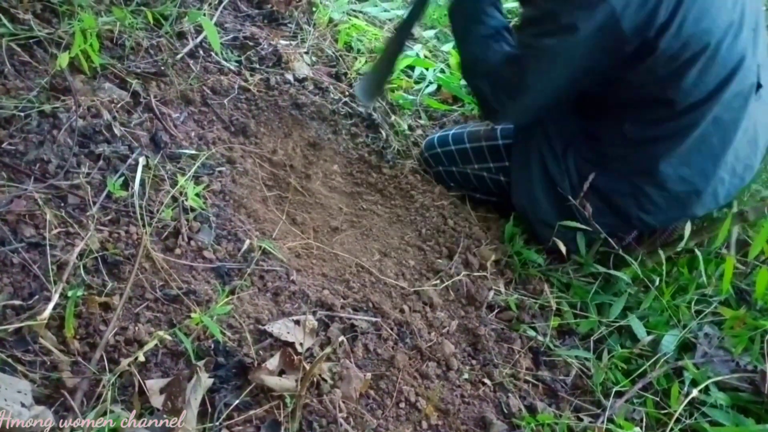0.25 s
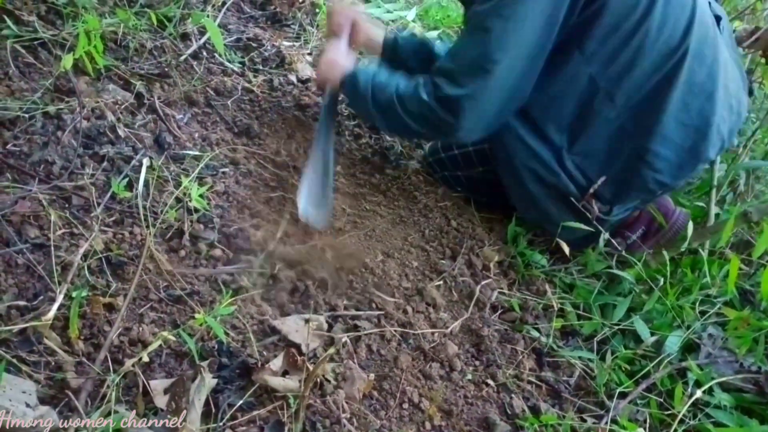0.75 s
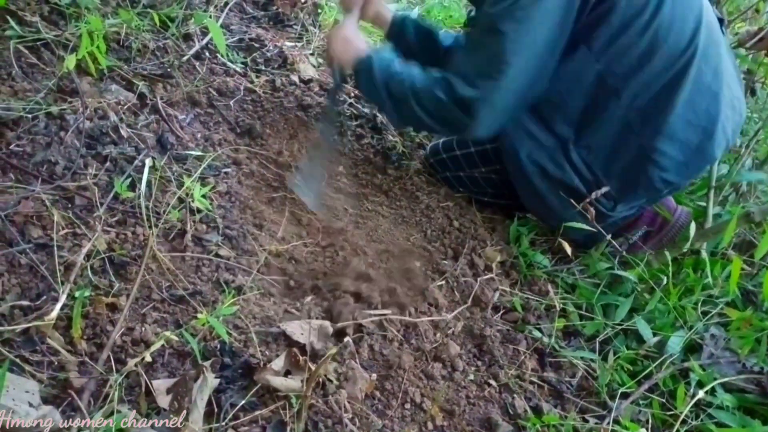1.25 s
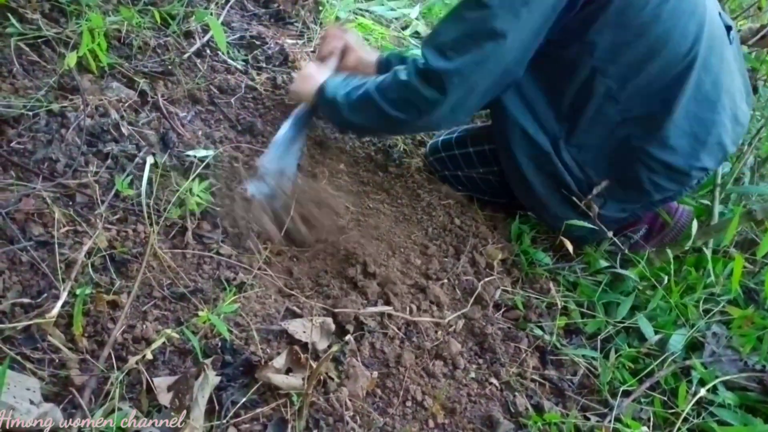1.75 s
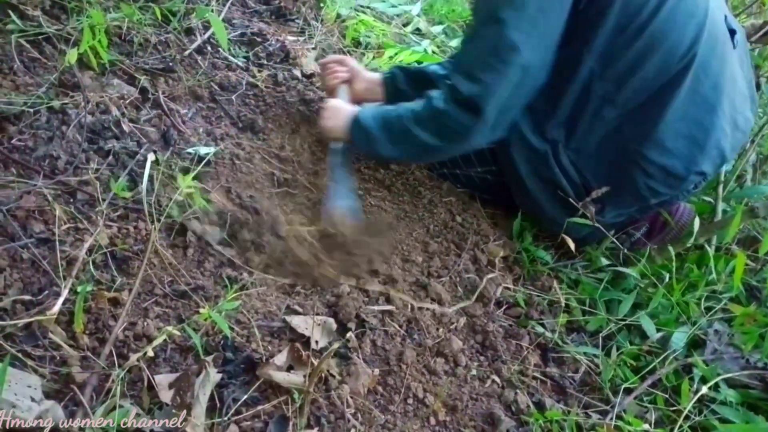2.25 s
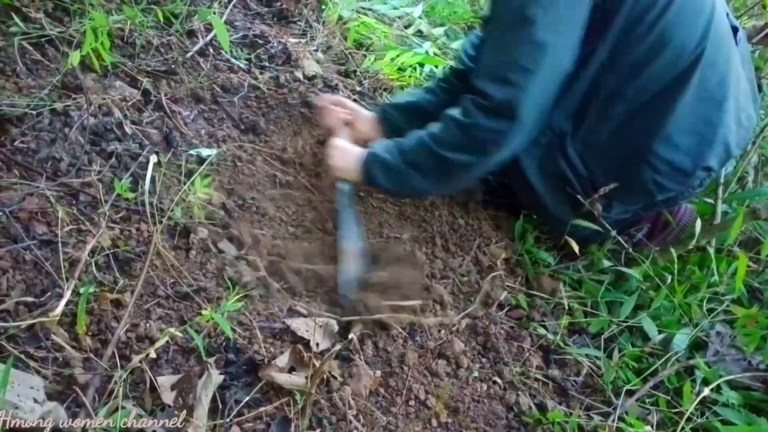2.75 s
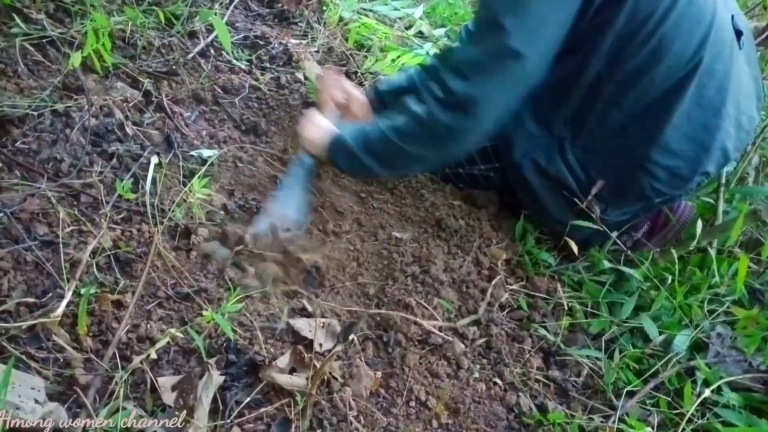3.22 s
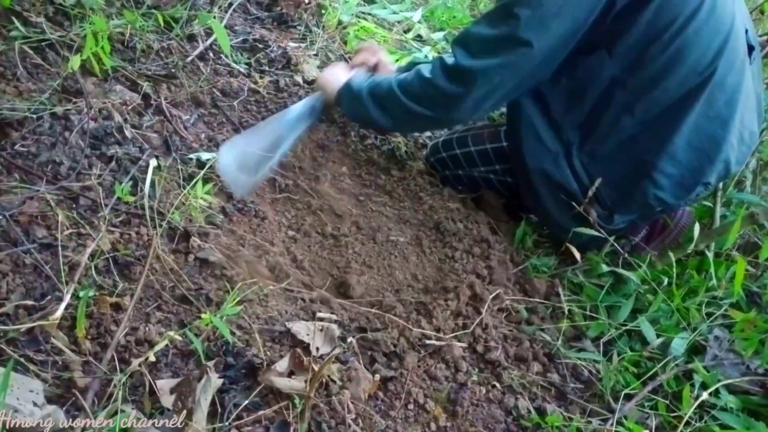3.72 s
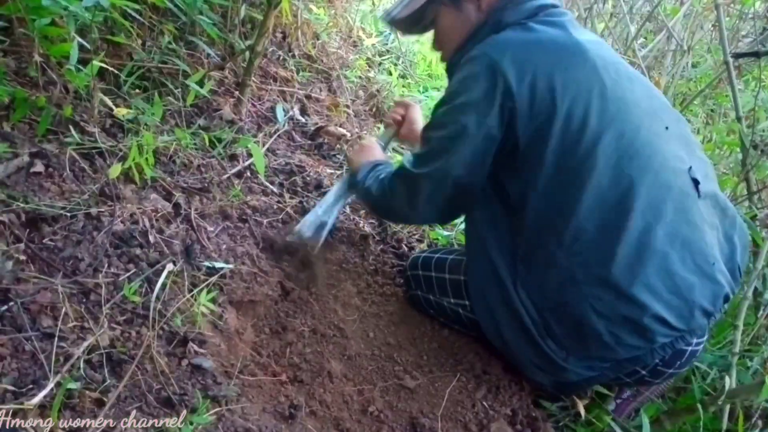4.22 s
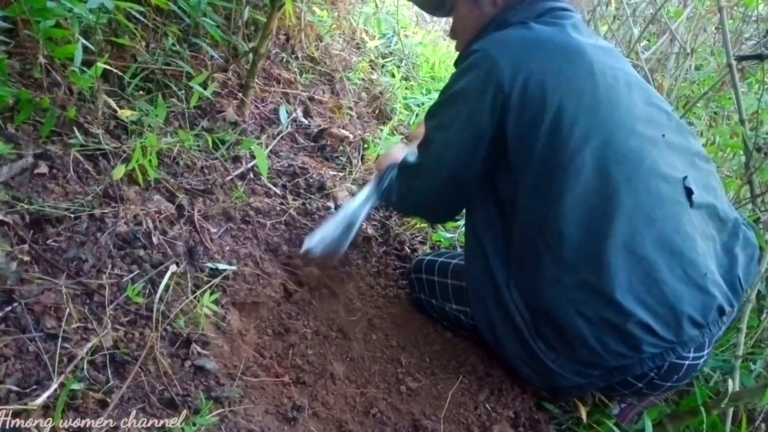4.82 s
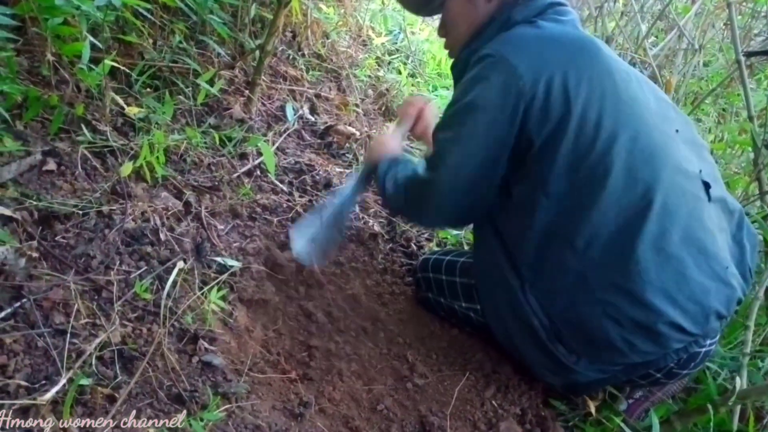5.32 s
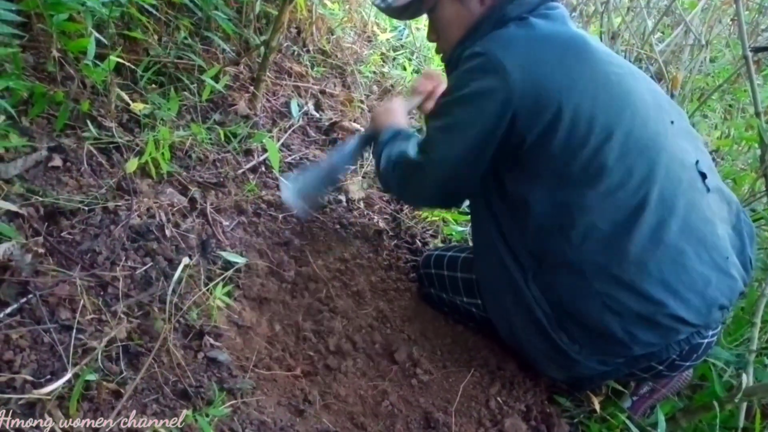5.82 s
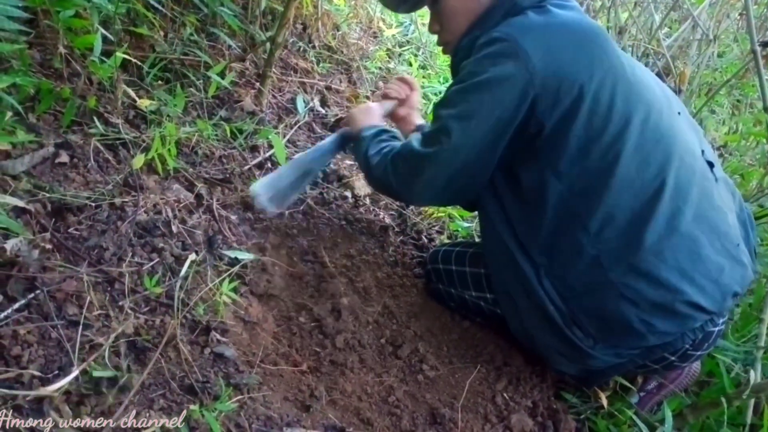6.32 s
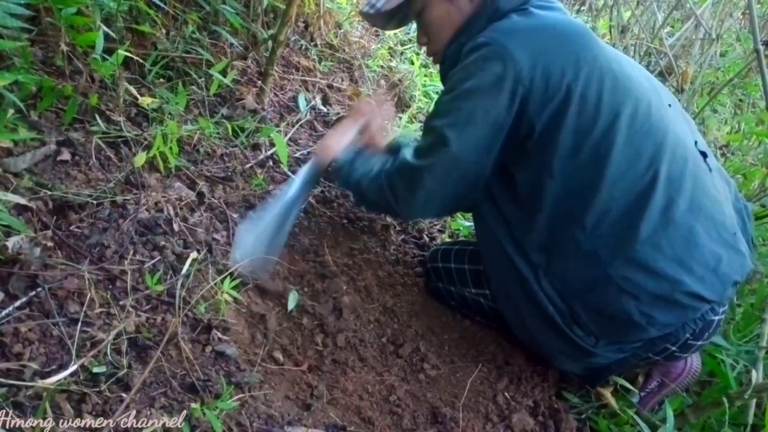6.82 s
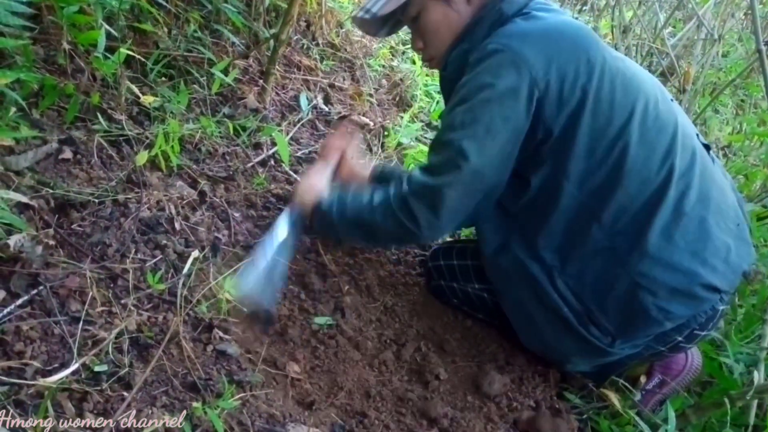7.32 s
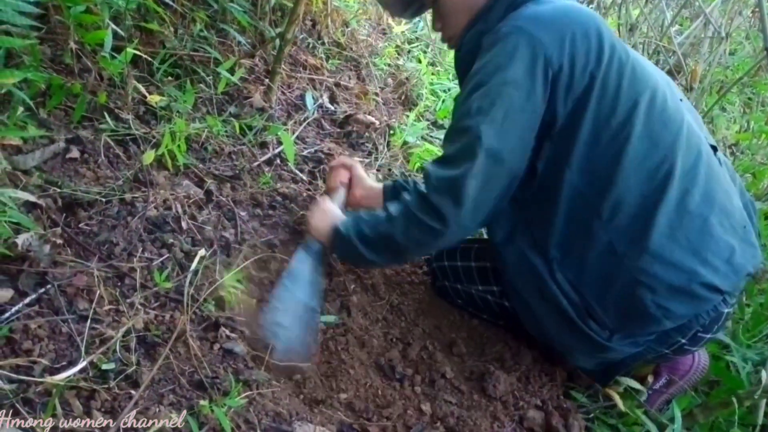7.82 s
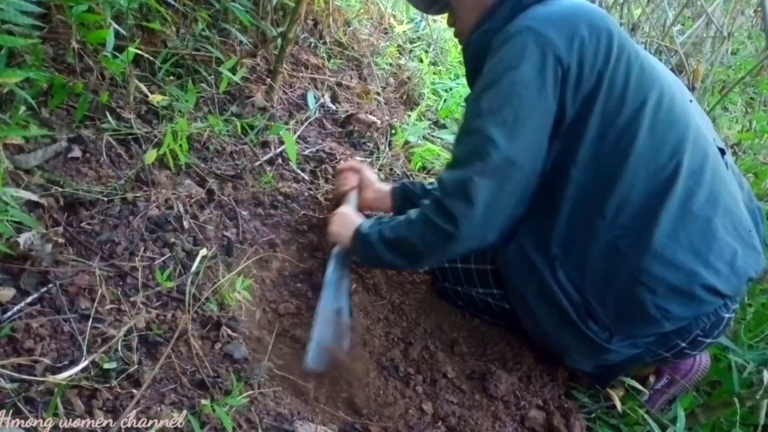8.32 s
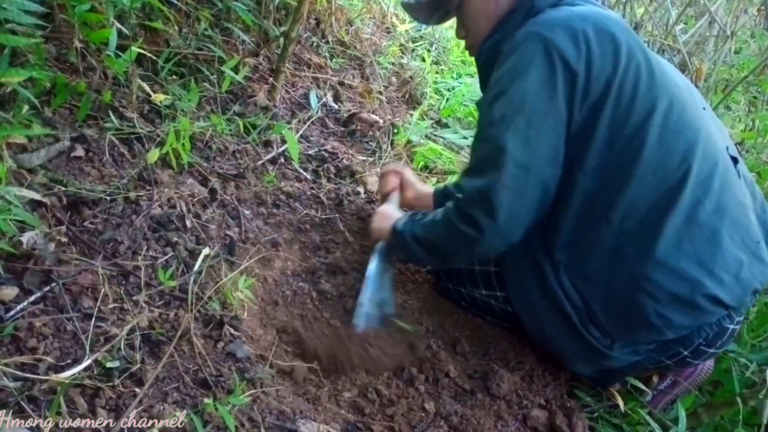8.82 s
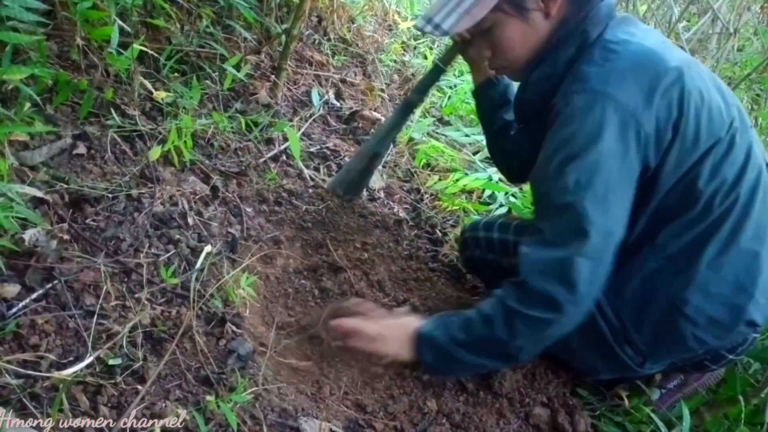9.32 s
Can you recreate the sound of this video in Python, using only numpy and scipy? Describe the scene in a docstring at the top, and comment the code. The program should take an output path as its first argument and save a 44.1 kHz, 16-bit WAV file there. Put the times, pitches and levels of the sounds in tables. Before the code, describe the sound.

A steel blade chops into loose soil about twice a second, crunching and ringing as crumbs patter down.

```python
"""First comes a faint open-air hiss and a trickle of loose soil. Then a broad steel blade chops into a
hillside about twice a second: each bite thuds, crunches and sets the steel ringing, and small stones
jolt it. Between chops, flung soil patters down, pebbles tick and clink, and a few clods land.
The digging moves on to a firmer, moister spot, where hard blows make the tool knock,
while an insect trills far away."""
import sys
import numpy as np
from scipy import signal
from scipy.io import wavfile

SR = 44100
rng = np.random.default_rng(int(sys.argv[2]) if len(sys.argv) > 2 else 0)


def master_out(mix):
    """Clip the mix to full scale and print it as 16-bit PCM to the path in sys.argv[1]."""
    frames = np.transpose(np.atleast_2d(mix))
    ceiling = np.clip(frames, -1, 1)
    pcm = np.round(ceiling * 32767).astype(np.int16)
    wavfile.write(sys.argv[1], SR, pcm)


N = 421596
SECOND_SPOT_S = 3.9  # when the digging moves to firmer, moister ground


def amp(db):
    """Turns decibels into a number to multiply by."""
    return 10 ** (np.asarray(db) / 20)


def unit(x):
    """Scales a sound to an energy of one."""
    return x / np.sqrt(np.sum(x ** 2) + 1e-20)


def add(mix, s, sound):
    """Mixes a sound in, starting at s seconds."""
    part = mix[max(round(s * SR), 0):][:len(sound)]
    part += sound[:len(part)]


def through(x, response):
    """Plays a sound through an object, given the object's response to one tap."""
    return signal.oaconvolve(x, response)[:len(x)]


def click(spectrum, size=8192):
    """The shortest click with this spectrum (how strong each frequency is)."""
    hz, db = np.transpose(spectrum)
    bins_hz = abs(np.fft.fftfreq(size, 1 / SR))
    log_gain = np.log(amp(np.interp(np.log(bins_hz + 1), np.log(hz), db)))
    front_loaded = np.exp(np.conj(signal.hilbert(log_gain)))  # minimum phase: energy comes early
    return unit(np.fft.ifft(front_loaded).real[:size // 2])


def mode(hz, t60):
    """One natural tone of an object, fading by 60 dB in t60 seconds."""
    t = np.arange(SR // 5) / SR
    return unit(np.exp(-np.log(1000) * t / t60) * np.sin(2 * np.pi * hz * t))


def grains(count, per_s, spread_db):
    """Random tiny impacts, many small and a few large, at an average power of one."""
    size = amp(abs(spread_db) * np.minimum(rng.exponential(1, count), 4))
    sign = rng.choice([-1, 1], count)
    lands = rng.random(count) < per_s / SR
    return np.sqrt(count) * unit(size * sign * lands)


def wander(count, per_s):
    """A curve that drifts to a new random value per_s times a second."""
    targets = rng.standard_normal(N // 20)
    return np.interp(np.arange(count) * per_s / SR, np.arange(len(targets)), targets)


def push(t, rise, hold, fall):
    """A force that builds, holds and dies away (times in seconds)."""
    return np.minimum(t / rise, 1) * np.exp(-np.maximum(t - hold, 0) / fall)


def excite(force, impacts, response):
    """Tiny impacts shake an object; the sound is as strong as the force behind them."""
    return np.linalg.norm(force) * unit(through(force * impacts, response))


# The tone colour of the open air: f/Hz, level/dB
AIR_SPECTRUM = [(25, 8), (45, -11), (80, -1.5), (125, 1), (200, -1.5), (310, -9), (750, -5.5),
                (1250, -11.5), (2000, -13), (3000, -11), (4600, -25.5), (6500, -19.5), (11000, -27),
                (15500, -34)]
def air(level_db=-61.5):
    """Outdoor hiss over a soft rumble, wavering slightly."""
    gain = amp(level_db + wander(N, per_s=4.6))
    return gain * through(rng.standard_normal(N), click(AIR_SPECTRUM))


# The blade's own tones: f/Hz, fade time in free air/s, level at first spot/dB, level at second spot/dB
BLADE_MODES = [(2000, 0.016, -43, -6), (2315, 0.022, -5, -1), (2751, 0.16, 3.5, 8), (2848, 0.11, 6, -32),
               (2877, 0.0094, -9, -8), (3050, 0.021, -10, -14), (3246, 0.086, -4, 2),
               (3484, 0.032, -8, -11), (3690, 0.2, -6.5, -6.5), (3708, 0.25, -10, -3.5),
               (3890, 0.082, -37, -8), (4500, 0.06, -41, -16), (5130, 0.054, -38, -8.5),
               (5930, 0.046, -22, -13), (6260, 0.13, -11.5, -24), (6950, 0.045, -9, -26),
               (8740, .055, -10, -5.5), (10900, 0.07, -18, -13), (12300, 0.08, -24, -19)]
# The tone colour of grit scraping steel: f/Hz, level/dB
SCRAPE_SPECTRUM = [(1000, -9.5), (1900, -7.5), (2400, 1), (2900, 11.5), (3650, 4.5), (4100, -30.5),
                   (5000, -36), (11000, -27), (15500, -45)]
def blade(s, loss, scrape_db, clink_db=0, scatter_db=4.5):
    """One grain on steel: a dry scrape, and tones that soil muffles (loss, per s) and slightly detunes."""
    clink_hz, clink_width_hz = 3600, 340  # these tones sing out when the blade's corner strikes
    ring = 0
    for hz, t60, *spot_db in BLADE_MODES:
        db = spot_db[int(s > SECOND_SPOT_S)] + scatter_db * rng.standard_normal()
        db += clink_db * np.exp(-((hz - clink_hz) / clink_width_hz) ** 2)
        detune = 1 + 0.00063 * loss * rng.standard_normal()
        ring = ring + amp(db) * rng.choice([-1, 1]) * mode(hz * detune, 1 / (1 / t60 + loss))
    ring = unit(ring)
    add(ring, 0, amp(scrape_db) * click(SCRAPE_SPECTRUM))
    return unit(ring)


# Crumbs that never quite settle, one row per spot: slide level/dB, patter level/dB
CRUMB_TRICKLE = [(-62, -71), (-91, -71)]
# Loads of flung soil: t/s at the thickest, spread/s, slide level/dB, patter level/dB
SOIL_THROWS = [(0.39, 0.049, -58, -65.5), (0.679, 0.025, -54, -62), (1.08, 0.073, -51.5, -60),
               (1.659, 0.081, -54, -61.5), (1.846, 0.038, -54, -55.5), (2.16, 0.06, -47, -57.5),
               (2.349, 0.072, -58.5, -61.5), (2.719, 0.054, -55, -60.5), (2.861, 0.039, -53, -57.5),
               (3.209, 0.036, -47.5, -61), (3.35, 0.11, -48.5, -56), (3.53, 0.05, -49, -54.5),
               (4.08, 0.03, -62, -58.5), (4.29, 0.029, -65, -66), (5.169, 0.042, -61, -62),
               (5.65, 0.028, -60, -58), (5.961, 0.032, -53.5, -60.5), (6.459, 0.011, -49, -57.5),
               (6.98, 0.062, -55.5, -57), (7.241, 0.062, -52, -55), (7.469, 0.073, -62, -59.5),
               (7.77, 0.04, -53, -56.5), (8.238, 0.015, -53, -55.5), (8.37, 0.033, -60.5, -56),
               (8.719, 0.069, -66, -64), (9.219, 0.092, -57.5, -64)]
def soil_flow(step_s=0.002):
    """How much soil slides and patters: a trickle, the throws, and what strokes and stones loosen."""
    cave_in_db, cave_in_s = -13, 0.035  # the walls of a cut crumble behind the blade
    shatter_db, shatter_s = -8.5, 0.0068  # a struck stone scatters crumbs
    t = np.arange(0, N / SR, step_s)
    power = amp(CRUMB_TRICKLE)[(t > SECOND_SPOT_S).astype(int)] ** 2
    showers = [(s, spread, spread, *levels_db) for s, spread, *levels_db in SOIL_THROWS]
    for s, length, _, crunch_db, ring_db, *_ in BLADE_STROKES:
        showers.append((s + length, length / 2, cave_in_s, ring_db + cave_in_db, crunch_db + cave_in_db))
    for s, _, crunch_db, *_ in STONE_HITS:
        showers.append((s + step_s, step_s, shatter_s, -np.inf, crunch_db + shatter_db))
    for s, rise, fall, *levels_db in showers:
        before, after = np.minimum(t - s, 0) / rise, np.maximum(t - s, 0) / fall
        swell = np.exp(-before ** 2 / 2 + 1 - np.hypot(1, after))
        power += np.outer(swell, amp(levels_db)) ** 2
    return [np.interp(np.arange(N) / SR, t, flow) for flow in np.sqrt(power).T]


# The tone colour of falling crumbs: f/Hz, level/dB
PATTER_SPECTRUM = [(50, -22.5), (130, 2), (400, -5), (1500, -2), (3000, -1), (4600, -6), (6400, 3.5),
                   (8500, -4.5), (9800, -3.5), (11000, 2), (13000, -10.5), (15500, -15)]
def spill(slide_db=-5, patter_db=-0.27):
    """Crumbs slide along the lifted blade and shower onto soil and dry leaves."""
    slide, patter = soil_flow()
    clumps = amp(2.36 * wander(N, per_s=61))
    sliding = amp(slide_db) * slide * clumps * grains(N, per_s=900, spread_db=2.5)
    falling = amp(patter_db) * patter * clumps * grains(N, per_s=2600, spread_db=2.4)
    out = through(falling, click(PATTER_SPECTRUM))
    starts = [0] + [stroke[0] for stroke in BLADE_STROKES]
    for start, end in zip(starts, starts[1:] + [N / SR]):  # each stroke leaves new soil on the steel
        steel = blade(start, loss=25, scrape_db=-1.5, scatter_db=7)
        add(out, start, signal.fftconvolve(sliding[round(start * SR):round(end * SR)], steel))
    return out


def singing(pitch_hz, ring_share=0.97):
    """The lifted blade rings on in its tone nearest this pitch, roughened by crumbs lying on it."""
    hz, t60, *_ = min(BLADE_MODES, key=lambda row: abs(row[0] - pitch_hz))
    ring = mode(hz, t60 * ring_share)
    return unit(ring * (1 + 0.75 * wander(len(ring), per_s=380)))


# The tone colour of soil being crushed: f/Hz, level/dB
CRUNCH_SPECTRUM = [(40, -56), (150, -7), (350, -1), (600, -2), (800, 0), (980, -6), (1550, 1), (1900, -5.5),
                   (2600, 2), (4200, -15), (8000, -52.5)]
def lumps(count=170, ring_db=-4):
    """Larger lumps in each throw burst on the lifted blade: a coarse crackle and a touch of ringing."""
    out, t = np.zeros(N), np.arange(SR // 10) / SR
    burst = push(t, rise=0.00099, hold=0.001, fall=0.0015)
    crumb = click(CRUNCH_SPECTRUM) + click(SCRAPE_SPECTRUM)
    for k, (delay, smallness, place) in enumerate(rng.random((count, 3))):
        s, spread, slide_db, _ = SOIL_THROWS[k % len(SOIL_THROWS)]
        lump = amp(ring_db) * singing(2500 + 1100 * place, ring_share=0.6)
        add(lump, 0, unit(through(burst * rng.standard_normal(len(t)), crumb)))
        peak_db = slide_db + 8 - 10 * smallness
        add(out, s + 3 * spread * (delay - 0.5), amp(peak_db) * lump / abs(lump).max())
    return out


def pebble(hz, grit):
    """A small stone or dry stalk: a gritty click with one very short tone."""
    body = amp(-2) * mode(hz, t60=0.004)
    add(body, 0, grit)
    return unit(body[:len(grit)])


def any_pebble(grit, usual_hz=8030, spread=0.19):
    """A pebble of random size, and so of random pitch."""
    return pebble(usual_hz * np.exp(spread * np.clip(rng.standard_normal(), -2, 2)), grit)


# The tone colour of fine grit: f/Hz, level/dB
GRIT_SPECTRUM = [(1500, -12), (3000, 7.5), (4600, -7), (5600, 1.5), (6700, 5), (8300, -0.5), (10000, -3),
                 (11000, -2.5), (13000, -11.5), (15500, -26)]
# Single pebbles and dry stalks ticking, and a few bright, high pings at hard strikes: t/s, peak level/dB, f/Hz
PEBBLE_TICKS = [(0.716, -49, 6720), (2.613, -36, 8870), (2.617, -33, 9600), (3.259, -41, 6630),
                (3.948, -46.5, 7240), (4.3175, -51.5, 7230), (4.42, -44, 5060), (5.722, -42, 5270),
                (5.8611, -48, 6900), (6.028, -48.5, 8600), (6.1866, -48, 8600), (6.2345, -46, 6700),
                (6.546, -38, 8800), (6.943, -44, 5300), (7.105, -47, 5350), (7.586, -48, 5680),
                (7.954, -47.5, 6050), (8.104, -28.5, 7150), (8.2114, -46, 8500), (8.5025, -41, 6960),
                (8.7824, -46, 7000), (8.93, -46.5, 6700), (9.03, -44, 6140)]
def ticks(count=200, over_patter_db=8, flight_s=0.04, scatter_s=0.063):
    """Pebbles hit with a dry snap; each throw scatters extra ones, louder when its patter is louder."""
    out, t = np.zeros(N), np.arange(SR // 20) / SR
    grit = click(GRIT_SPECTRUM)
    snap = push(t, rise=0.00059, hold=0.0005, fall=0.0053)
    hits = [(s, db, pebble(hz, grit)) for s, db, hz in PEBBLE_TICKS]
    for k, (delay, smallness) in enumerate(zip(rng.standard_normal(count), rng.random(count))):
        s, _, _, patter_db = SOIL_THROWS[k % len(SOIL_THROWS)]
        landing_s = s + flight_s + scatter_s * delay
        hits.append((landing_s, patter_db + over_patter_db - 8 * smallness, any_pebble(grit)))
    for s, db, body in hits:
        tick = through(snap * rng.standard_normal(len(t)), body)
        add(out, s, amp(db) * tick / abs(tick).max())
    return out


def ground(s, knock_db):
    """The crunch of one crumb; the firmer second spot also makes the tool knock."""
    crunch = np.zeros(SR // 5)
    add(crunch, 0, click(CRUNCH_SPECTRUM))
    if s > SECOND_SPOT_S:
        crunch += amp(knock_db) * unit(sum(amp(db) * mode(hz, t60) for hz, t60, db in KNOCK_MODES))
    return crunch


# How fast soil muffles the buried blade: loss at first spot/(1/s), loss at second spot/(1/s)
SOIL_GRIP = (15.8, 13)
# The tone colour of the ground giving way: f/Hz, level/dB
THUD_SPECTRUM = [(30, -46), (65, -12), (110, -3), (160, 3), (270, 1), (380, -7.5), (600, -15.5),
                 (1200, -36)]
# Chops into the soil and a few light scrapes of the blade:
# t/s, length/s, then level/dB of thud, crunch, ring and grit, then clink boost/dB
BLADE_STROKES = [(0.458, 0.028, -52, -44, -38.5, -49.5, 9), (0.929, 0.025, -49.5, -47.5, -42.5, -52, -4),
                 (1.512, 0.028, -46.5, -39.5, -35, -59, 9), (1.789, 0.019, -66, -57.5, -46.5, -49.5, 7),
                 (2.025, 0.028, -45.5, -43, -41, -45.5, 15), (2.586, 0.0041, -60, -54, -43, -54, -6),
                 (2.606, 0.034, -64, -65, -47.5, -51.5, 14),
                 (2.659, 0.012, -51.5, -46.5, -41.5, -47.5, 6.5), (2.79, 0.0079, -77, -77, -45.5, -78, -1),
                 (3.131, 0.018, -49.5, -49, -40.5, -50, 1), (3.703, 0.019, -60, -52, -49, -52.5, 9),
                 (4.119, 0.022, -48.5, -46.5, -43.5, -46, -18), (4.557, 0.0058, -56, -51, -42, -46, 5),
                 (4.981, 0.022, -43, -42.5, -46, -43, 8), (5.439, 0.037, -46.5, -45, -44.5, -49.5, -7),
                 (5.884, 0.038, -48.5, -44, -47, -50, 2), (6.316, 0.038, -48.5, -45, -47, -47, 11),
                 (6.462, 0.004, -68, -75, -45, -53, -12), (6.775, 0.037, -51, -47.5, -42, -48.5, 1),
                 (7.243, 0.035, -49.5, -48.5, -48.5, -50, -5), (7.305, 0.02, -78, -50.5, -56, -61, 2),
                 (7.66, 0.026, -48.5, -51, -47.5, -51, 0), (8.102, 0.02, -48.5, -47, -45.5, -50, 0),
                 (8.612, 0.013, -61, -52, -47, -54.5, -13), (9.028, 0.014, -64, -57.5, -47, -53, 12)]
def strokes():
    """The edge rings as it meets soil and crushes crumbs in uneven slips; the ground thuds last."""
    out, t = np.zeros(N), np.arange(SR // 3) / SR
    thud, grit = click(THUD_SPECTRUM), click(GRIT_SPECTRUM)
    for s, length, thud_db, crunch_db, ring_db, grit_db, clink_db in BLADE_STROKES:
        slips = amp(2.6 * wander(len(t), per_s=260))
        cut = push(t, rise=0.0014, hold=length, fall=0.013) * slips
        crush = push(t, rise=0.004, hold=length, fall=0.012) * slips
        drag = push(t, rise=0.005, hold=length, fall=0.014) * slips
        heave = push(t, rise=0.0086, hold=length + 0.002, fall=0.023)
        crumbs = grains(len(t), per_s=8000, spread_db=3)
        steel = blade(s, loss=SOIL_GRIP[int(s > SECOND_SPOT_S)], scrape_db=-9.5, clink_db=clink_db)
        add(out, s, amp(thud_db) * excite(heave, crumbs, thud))
        add(out, s, amp(crunch_db) * excite(crush, crumbs, ground(s, knock_db=-13.5)))
        add(out, s, amp(ring_db) * excite(cut, crumbs, steel))
        add(out, s, amp(grit_db) * excite(drag, crumbs, grit))
    return out


# Stones struck inside the cut: t/s, then relative level/dB of thud, crunch, ring and grit
STONE_HITS = [(0.459, -64, -67, -32.5, -59), (0.469, -38, -39, -54, -61), (0.499, -71, -57, -33.5, -37),
              (0.938, -43, -46.5, -35.5, -59), (1.509, -67, -57, -37, -68),
              (1.532, -31.5, -28.5, -25.5, -25), (1.54, -72, -43, -52, -27),
              (2.059, -37, -36.5, -23.5, -29), (2.067, -39, -40, -49, -40), (2.589, -42, -46, -39.5, -60),
              (2.661, -68, -49, -42, -34), (3.14, -59, -47, -39, -50), (3.202, -66, -51, -53, -70),
              (4.137, -57, -44.5, -37, -45), (4.566, -40.5, -35.5, -43, -32), (4.571, -47, -52, -37, -27.5),
              (5.01, -79, -62, -33.5, -49), (5.509, -43, -41, -46, -28.5), (5.917, -49, -51, -48, -51),
              (6.369, -49, -43.5, -35, -32), (6.764, -72, -55, -51, -39.5), (6.798, -63, -53, -57, -30),
              (6.808, -74, -71, -34, -52), (7.264, -66, -53, -54, -33), (7.306, -73, -63, -42, -34.5),
              (7.326, -51, -65, -42, -45), (8.137, -44, -37.5, -32, -55)]
def stones():
    """Hitting a stone makes a brief burst of cracks; the soil soon stops the buried blade ringing."""
    out, t = np.zeros(N), np.arange(SR // 4) / SR
    thud, grit = click(THUD_SPECTRUM), click(GRIT_SPECTRUM)
    crack = 1.6 * push(t, rise=0.0013, hold=0.0014, fall=0.0027)
    splinter = 0.56 * push(t, rise=0.0015, hold=0.00047, fall=0.0088)
    heave = 1.6 * push(t, rise=0.0011, hold=0.0022, fall=0.0045)
    for s, thud_db, crunch_db, ring_db, grit_db in STONE_HITS:
        *_, clink_db = min(BLADE_STROKES, key=lambda row: abs(row[0] - s))  # from the nearest stroke
        steel = blade(s, loss=SOIL_GRIP[int(s > SECOND_SPOT_S)], scrape_db=-7, clink_db=clink_db)
        cracks = grains(len(t), per_s=9000, spread_db=1)
        rocking_ground = amp(-18.5) * mode(175, t60=0.05) + amp(-22) * mode(263, t60=0.033)
        add(rocking_ground, 0, thud)
        add(out, s, amp(thud_db) * excite(heave, cracks, rocking_ground))
        add(out, s, amp(crunch_db) * excite(crack, cracks, ground(s, knock_db=5)))
        add(out, s, amp(ring_db - 1.5) * excite(crack, cracks, steel))
        add(out, s, amp(grit_db) * excite(splinter, cracks, grit))
    return out


# Pebbles glancing off steel: t/s, relative level/dB of ring and of grit, f/Hz near the tone that sings
PEBBLE_CLINKS = [(0.668, -59, -46, 2350), (1.167, -46, -67, 2770), (1.62, -43.5, -48.5, 3500),
                 (1.64, -40.5, -60, 3640), (1.694, -47, -52, 2770), (2.105, -46, -43, 2770),
                 (2.17, -43.5, -50, 2770), (2.204, -45, -50, 3070), (2.897, -54, -43.5, 2350),
                 (3.259, -51, -46, 3280), (3.281, -45, -50, 3070), (3.797, -53, -46.5, 2770),
                 (3.979, -53.5, -55, 3070), (4.343, -46.5, -47.5, 3050), (4.408, -56, -57, 3070),
                 (5.039, -46, -48, 2770), (5.137, -54, -57, 2770), (6.521, -54, -53, 2770),
                 (6.546, -55, -55, 3680), (6.975, -48, -49, 3690), (7.05, -49, -48, 2770),
                 (7.192, -55, -48, 2770), (7.61, -54, -54, 2860), (7.818, -69, -49, 3730),
                 (8.238, -51.5, -48, 3680), (8.694, -53, -71, 2770), (8.75, -54, -68, 2770),
                 (8.962, -55, -56, 2860), (9.063, -52.5, -48.5, 3680)]
def clinks(jolt_size=10, sing_db=2, earth_db=-7):
    """A pebble ticks against the lifted blade, which rings on; earth stuck to the pebble crunches."""
    out, t = np.zeros(N), np.arange(SR // 4) / SR
    grit = click(GRIT_SPECTRUM)
    crack = 0.96 * push(t, rise=0.0012, hold=0.00081, fall=0.0042)
    splinter = 0.66 * push(t, rise=0.00089, hold=0.0006, fall=0.0089)
    for s, ring_db, grit_db, pitch_hz in PEBBLE_CLINKS:
        steel = blade(s, loss=3.9, scrape_db=-12)
        cracks = grains(len(t), per_s=10000, spread_db=3.5)
        jolt = cracks.copy()
        add(jolt, 0.001, np.array([jolt_size]))
        add(out, s, amp(ring_db + earth_db) * excite(splinter, cracks, ground(s, knock_db=-3)))
        add(out, s, amp(ring_db - 2) * excite(crack, jolt, steel))
        add(out, s, amp(grit_db) * excite(splinter, cracks, any_pebble(grit)))
        add(out, s, amp(ring_db + sing_db) * np.linalg.norm(splinter) * singing(pitch_hz))
    return out


# Clods landing or knocked by the blade: t/s, relative level/dB, f/Hz (heavy ones are low)
CLOD_HITS = [(2.134, -40, 450), (2.847, -42, 298), (3.29, -46, 120), (3.458, -27.5, 503),
             (3.637, -47.5, 130), (3.708, -40.5, 370), (5.087, -38, 480), (5.088, -41, 85),
             (5.326, -43.5, 92), (6.086, -45.5, 85), (7.512, -42.5, 86.5), (7.664, -28, 910),
             (7.785, -39, 88.5), (8.874, -47, 86)]
def clods(cycles=0.7, pat_db=-13):
    """Soft ground swings only once or twice under a clod, which pats as it crumbles."""
    out, t = np.zeros(N), np.arange(SR // 8) / SR
    for s, db, hz in CLOD_HITS:
        swing = np.sin(2 * np.pi * hz * t) * np.exp(-(hz * t / cycles) ** 2 / 2)
        contact = push(t, rise=0.00029, hold=0.22 / hz, fall=0.46 / hz)
        pat = excite(contact, rng.standard_normal(len(t)), click(CRUNCH_SPECTRUM))
        add(out, s, amp(db) * (0.72 * swing + amp(pat_db) * pat))
    return out


def moist_soil(x, corner_hz=10500, loss_db=-9):
    """The moister crumbs of the second spot sound duller: they have less top treble."""
    treble = signal.sosfiltfilt(signal.butter(3, corner_hz, "high", fs=SR, output="sos"), x)
    at_second_spot = np.arange(N) > SECOND_SPOT_S * SR
    return x - (1 - amp(loss_db)) * treble * at_second_spot


# The tool's low, hollow tones: f/Hz, fade time/s, level/dB
KNOCK_MODES = [(517, 0.027, -11.5), (827, 0.018, -1.5), (1177, 0.014, -1.5), (1358, 0.032, -5.5),
               (1544, 0.02, 3)]
# Hard blows in the firmer ground: t/s, peak level/dB, boost of higher tones/(dB per octave)
HARD_BLOWS = [(4.566, -23, -2.5), (5.5085, -30, 5), (6.521, -49, 13), (8.138, -38, -3)]
def knocks(contact_s=0.00081):
    """One clean, hard blow makes the whole tool knock in its low tones."""
    out = np.zeros(N)
    for s, db, tilt_db in HARD_BLOWS:
        body = sum(amp(mode_db + tilt_db * np.log2(hz)) * mode(hz, t60)
                   for hz, t60, mode_db in KNOCK_MODES)
        body *= np.minimum(np.arange(len(body)) / SR / contact_s, 1)  # softens the start
        add(out, s, amp(db) * body / abs(body).max())
    return out


# How loud the far insect is over time: t/s, level/dB
INSECT_LEVELS = [(3.9, -100), (5.7, -86), (6.6, -86), (8.0, -93), (9.3, -80)]
def insect(pitch_hz=4490, waver_hz=18, flutter_db=3):
    """A thin, unsteady trill from far off in the brush."""
    level_db = np.interp(np.arange(N) / SR, *np.transpose(INSECT_LEVELS))
    level_db += flutter_db * wander(N, per_s=31)
    turns = np.cumsum(pitch_hz + waver_hz * wander(N, per_s=88)) / SR
    return np.sqrt(2) * amp(level_db) * np.sin(2 * np.pi * turns)


def hillside(x, level_db=-18, t60=0.2):
    """The bank and the brush scatter back a faint, short echo."""
    t = np.arange(SR // 2) / SR
    echoes = rng.standard_normal(len(t)) * (t > 0.005) * np.exp(-np.log(1000) * t / t60)
    return x + amp(level_db) * through(x, unit(echoes))


def scene():
    """All the digging in the open air, in one channel."""
    hits = strokes() + stones() + knocks() + clinks() + lumps() + clods() + ticks()
    return (hillside(hits) + moist_soil(spill()) + air() + insect())[None]


def record(dry, rumble_cut_hz=58, treble_cut_hz=15700):
    """The microphone thins the deepest bass, then the highest treble is cut off."""
    thinned = signal.sosfilt(signal.butter(3, rumble_cut_hz, "high", fs=SR, output="sos"), dry)
    low_pass = signal.firwin(511, treble_cut_hz, window=("kaiser", 9), fs=SR)
    return signal.oaconvolve(thinned, low_pass[None], "same")


dry = scene()
out = record(dry)
master_out(out)
```